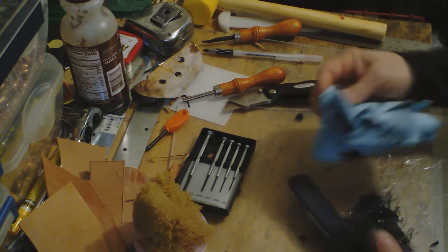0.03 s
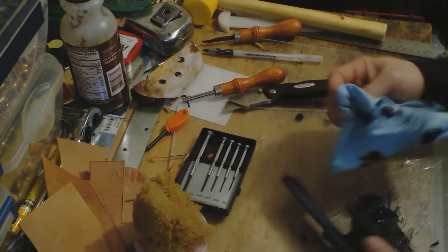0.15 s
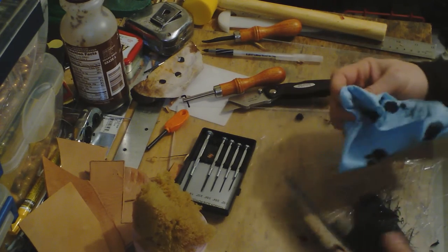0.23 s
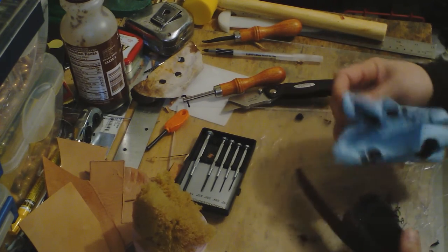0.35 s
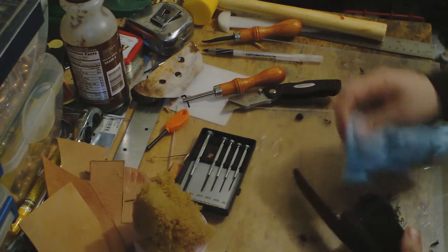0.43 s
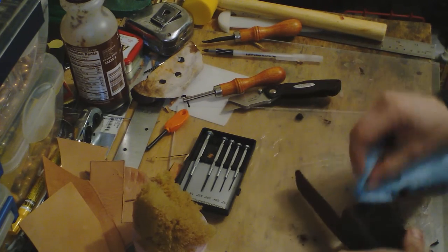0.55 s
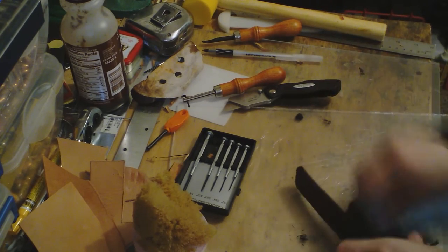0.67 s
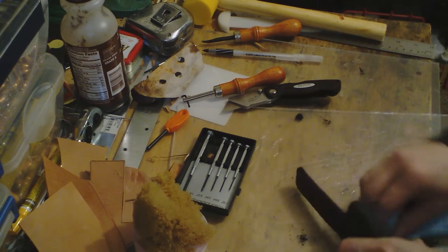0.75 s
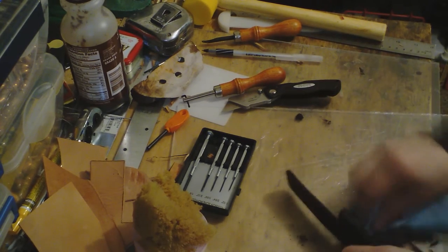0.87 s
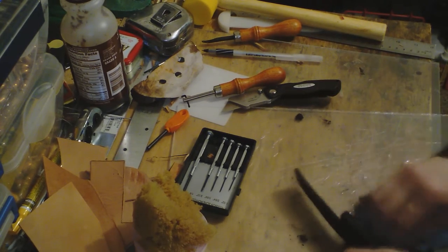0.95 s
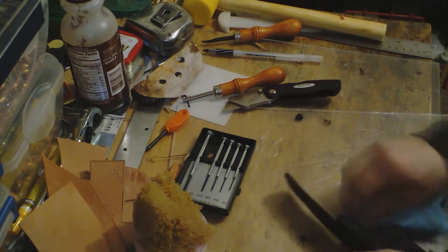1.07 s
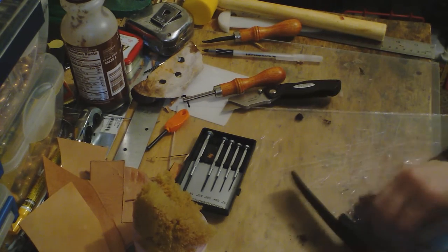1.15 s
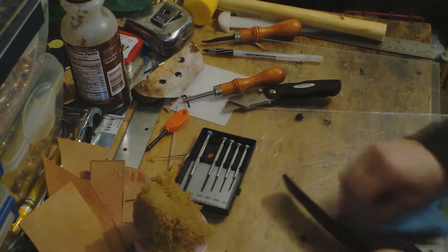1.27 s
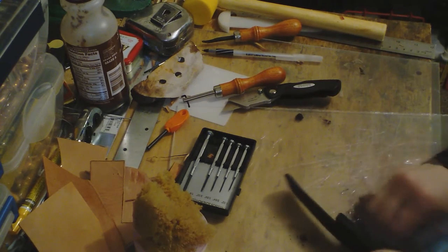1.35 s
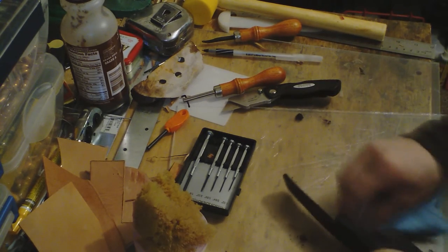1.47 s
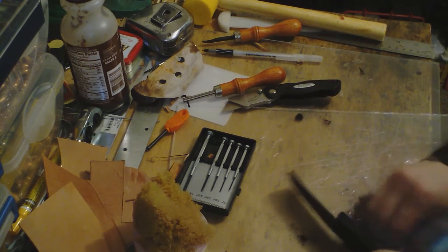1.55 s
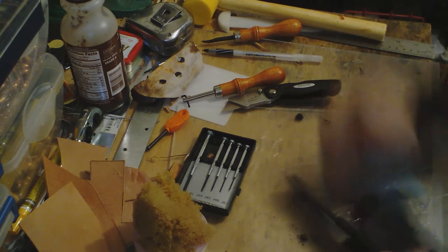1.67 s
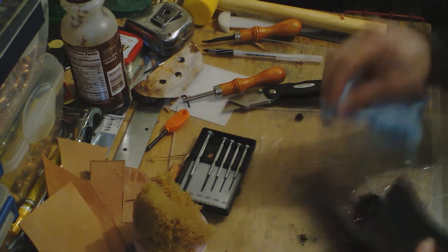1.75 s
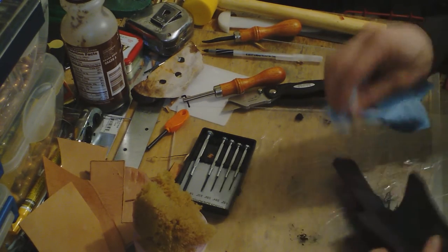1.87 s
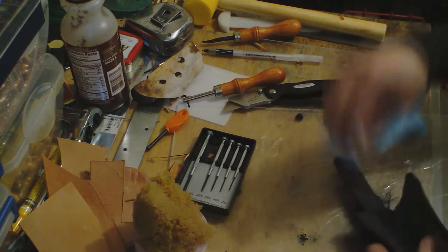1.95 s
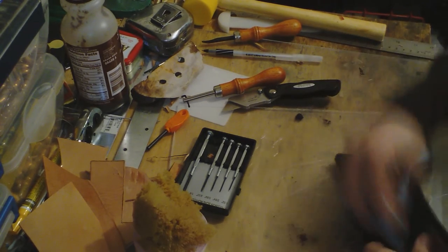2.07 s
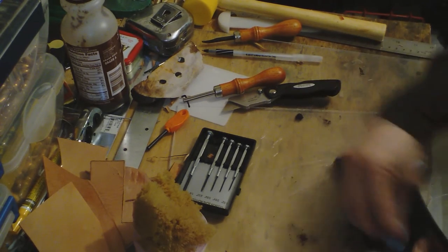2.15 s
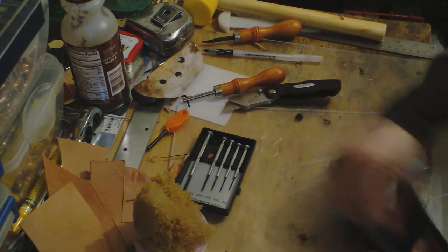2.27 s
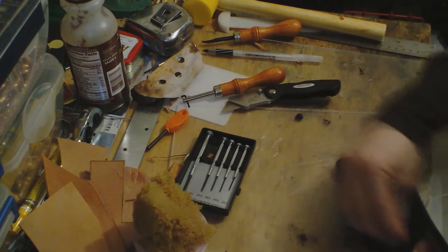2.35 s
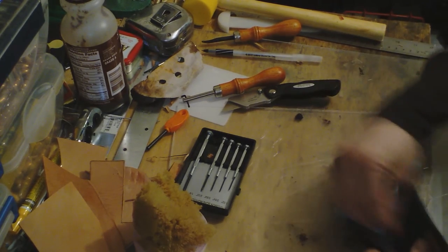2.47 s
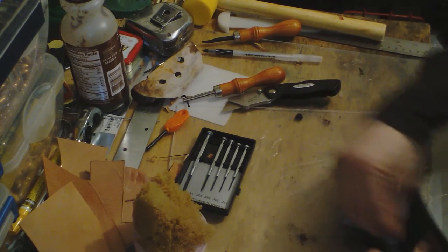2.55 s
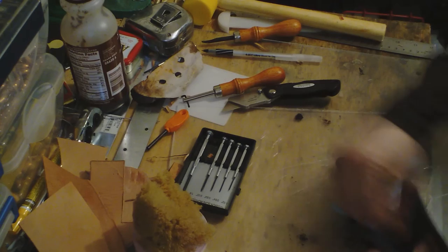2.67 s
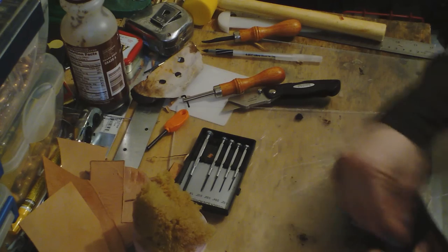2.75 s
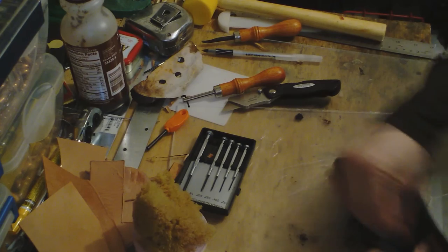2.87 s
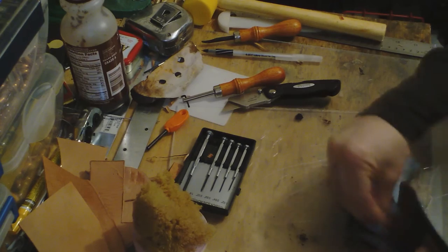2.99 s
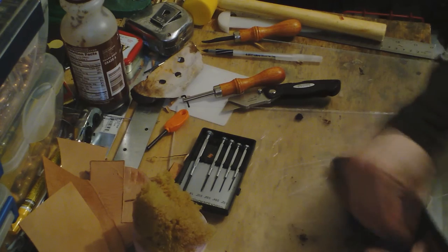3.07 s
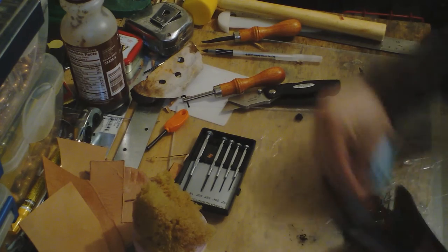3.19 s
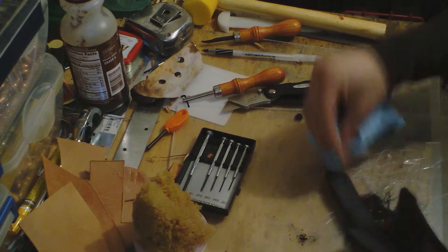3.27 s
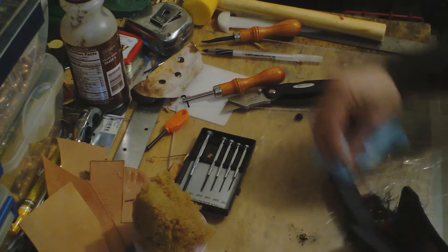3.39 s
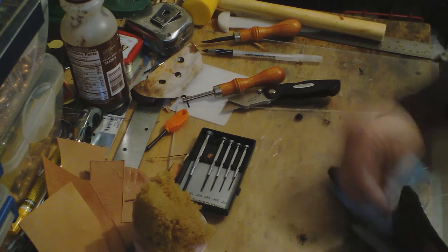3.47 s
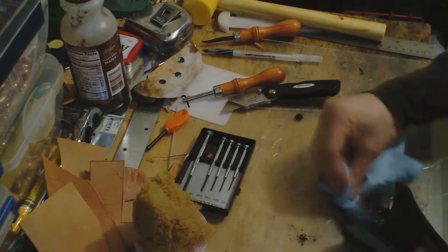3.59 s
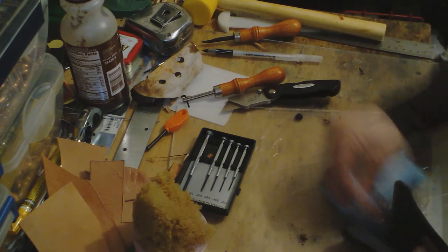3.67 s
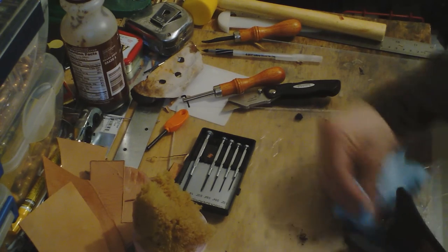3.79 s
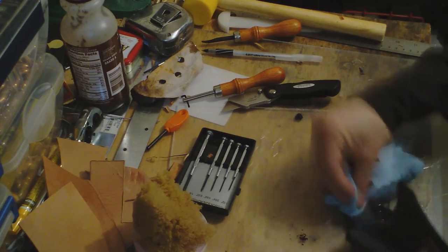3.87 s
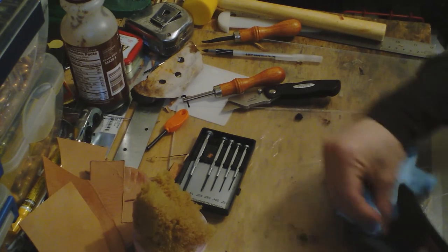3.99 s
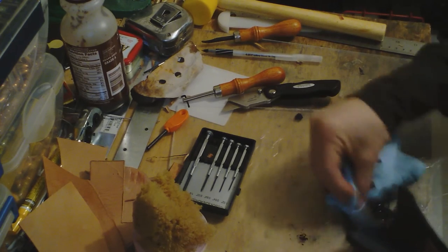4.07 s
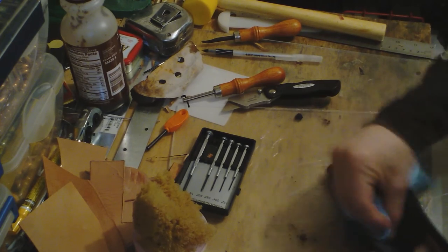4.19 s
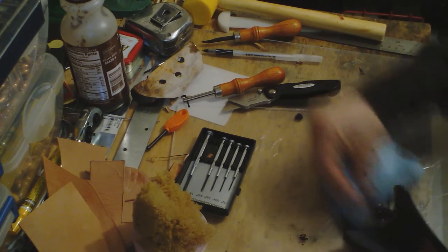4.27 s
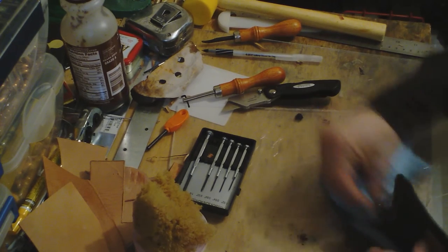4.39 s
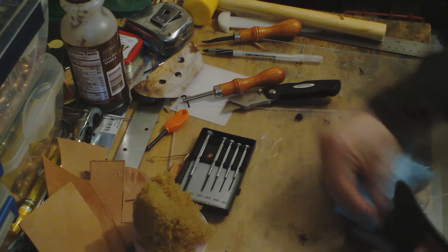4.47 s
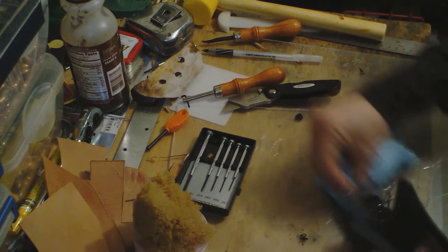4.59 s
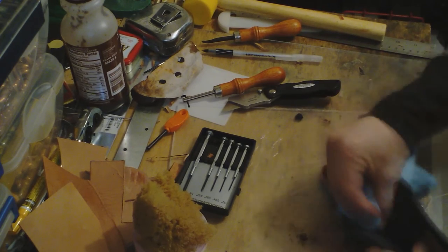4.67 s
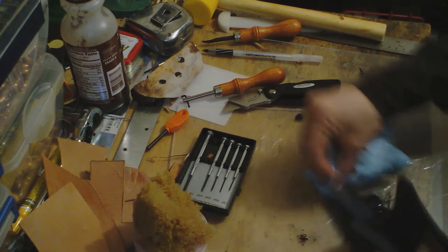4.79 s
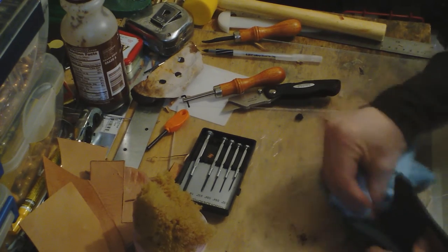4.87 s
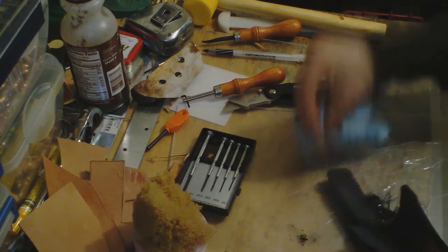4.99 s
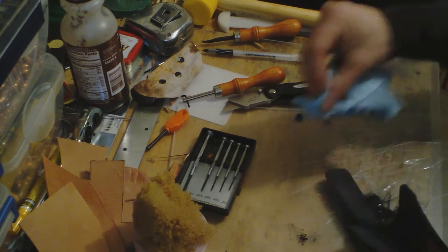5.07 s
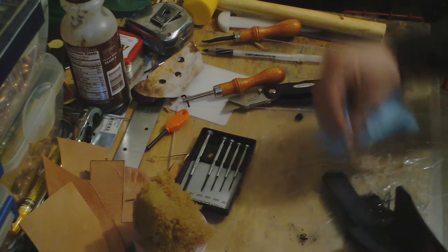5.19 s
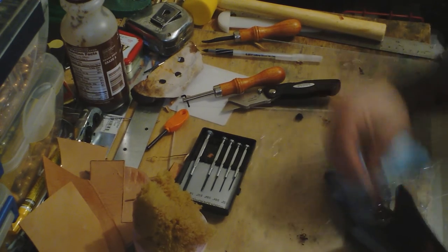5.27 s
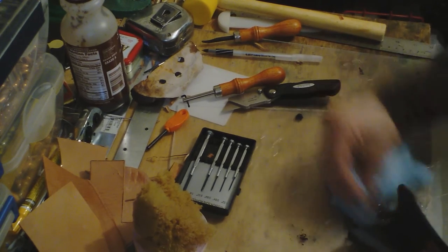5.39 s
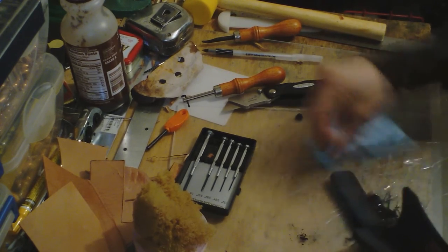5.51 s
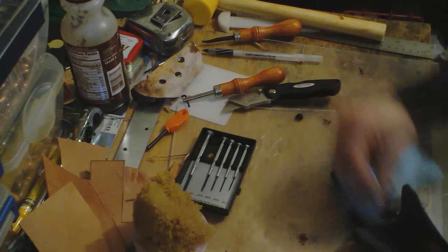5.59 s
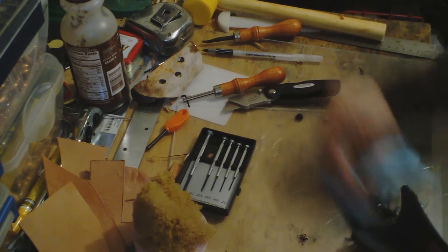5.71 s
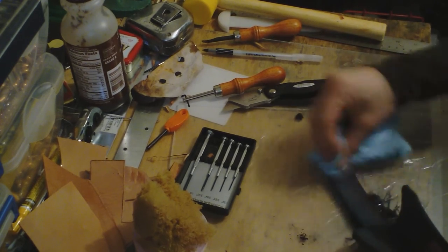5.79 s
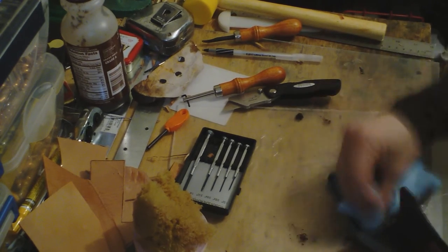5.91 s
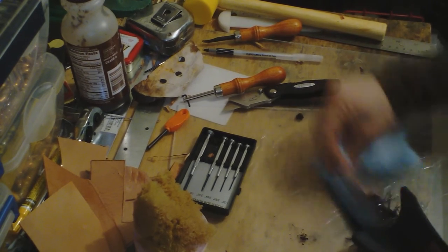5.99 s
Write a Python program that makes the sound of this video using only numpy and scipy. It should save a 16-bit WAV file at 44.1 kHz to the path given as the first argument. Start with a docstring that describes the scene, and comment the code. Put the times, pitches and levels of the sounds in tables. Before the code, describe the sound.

Close to one small microphone, with no room echo, someone briskly buffs leather with a paper towel on a wooden workbench. A fast run of papery swishes ends in a sharp, hollow knock. Two more runs follow, the last pressing harder on the wood, then two separate wipes. Light taps of the leather and low thuds and rumble from the hand come through the bench, with a constant hiss behind.

```python
"""A paper towel buffs a leather piece in quick strokes on a wooden workbench, heard close up.
Each stroke hisses in the air and drags grains of friction into the bench, which rings hollow
near 1.2 kHz. The piece knocks on the wood, and the hand thuds and rumbles through it.
One small microphone hears it all in mono, with no room echo, over a background hiss."""
import sys
import numpy as np
from scipy import signal
from scipy.fft import rfft, irfft, next_fast_len
from scipy.io import wavfile
from scipy.ndimage import uniform_filter1d

SR = 44100
rng = np.random.default_rng(int(sys.argv[2]) if len(sys.argv) > 2 else 0)


def store_wav(level_fs):
    """Save 16-bit WAV to argv[1]."""
    pcm = np.round(np.clip(np.atleast_2d(level_fs), -1, 1) * 32767)
    wavfile.write(sys.argv[1], SR, pcm.T.astype(np.int16))


N = 266805
TIME = np.arange(N) / SR


def from_db(db):
    """Decibels to gain."""
    return 10 ** (np.asarray(db) / 20)


def unit_rms(x):
    """Scale to rms 1."""
    return x / np.sqrt(np.mean(x ** 2) + 1e-20)


def drift(hz):
    """Slow random wander; rms 1."""
    r = np.exp(-2 * np.pi * hz / SR)
    return unit_rms(signal.lfilter([1], [1, -2 * r, r * r], rng.standard_normal(N + SR))[SR:])


def coloured(white, spectrum):
    """Give a white signal the spectrum of a table; rms 1."""
    size = next_fast_len(N)
    hz, db = np.transpose(spectrum)
    bins_hz = np.maximum(np.arange(size // 2 + 1) * SR / size, 1)
    gain = from_db(np.interp(np.log(bins_hz), np.log(hz), db))
    return unit_rms(irfft(rfft(white, size) * gain, size)[:N])


def ring(force, hz, t60):
    """One mode of the wood: a click sets a decaying sine ringing."""
    r, w = from_db(-60 / (t60 * SR)), 2 * np.pi * hz / SR
    return signal.lfilter([0, np.sin(w)], [1, -2 * r * np.cos(w), r * r], force + 1e-18)


def strike(modes, times, db, spread_db=1.5):
    """Each blow strikes every mode with a strength of its own."""
    at = np.round(times * SR).astype(int)
    scatter_db = rng.normal(0, spread_db, (len(at), len(modes)))
    sound = np.zeros(N)
    for k, (hz, mode_db, t60) in enumerate(modes):
        force = np.zeros(N)
        force[at] = (-1) ** k * from_db(db + mode_db + scatter_db[:, k])
        sound += ring(force, hz, t60)
    return sound


def cushioned(blows, band_hz):
    """A soft contact rounds the start of a blow: only a band of it is passed on."""
    return signal.sosfilt(signal.butter(2, band_hz, "band", fs=SR, output="sos"), blows)


def grains(per_s, spread_db):
    """Friction as random slips of uneven size; rms 1."""
    sizes = from_db(spread_db * np.minimum(rng.exponential(1, N), 4))
    signs = rng.choice([-1, 1], N)
    slips = rng.random(N) < per_s / SR
    return unit_rms(sizes * signs * slips)


def dragged(modes, pressure, per_s, spread_db):
    """Friction drives the bench modes; as the contact moves, each is driven more or less."""
    force = grains(per_s, spread_db)
    driven, steady = np.zeros((2, N))
    for k, (hz, db, t60) in enumerate(modes):
        weight = (-1) ** k * from_db(db)
        coupling = from_db(3.97 * drift(hz=10.4))
        driven += weight * ring(force * pressure * coupling, hz, t60)
        steady += weight * ring(force, hz, t60)
    return driven / np.std(steady)


# A thin band in the background hiss: (time [s], level [dB])
NARROW_HISS_LEVELS = [(0.0, -52.5), (0.7, -49.5), (1.7, -49.5), (2.3, -48), (3.0, -49), (3.5, -52.5),
                      (4.4, -47), (5.4, -55.5), (6.05, -50.5)]

def narrow_hiss():
    """Slow noise carried on a gliding tone: hiss near 5 kHz that wavers in pitch and level."""
    centre_hz, width_hz = 4963, 710
    level_db = np.interp(TIME, *np.transpose(NARROW_HISS_LEVELS))
    lowpass = signal.butter(2, width_hz / 2, fs=SR, output="sos")
    slow_noise = signal.sosfilt(lowpass, rng.standard_normal((2, N)))
    phase = 2 * np.pi * np.cumsum(centre_hz + 120 * drift(hz=5)) / SR
    band = unit_rms(slow_noise[0] * np.cos(phase) + slow_noise[1] * np.sin(phase))
    return band * from_db(level_db + 2.1 * drift(hz=29))


# Brief dips in the treble hiss: (time [s], length [ms])
HISS_DIPS = [(0.062, 64), (.195, 61), (.429, 32), (.56, 12), (0.628, 11), (1.095, 46), (2.063, 58),
             (2.564, 80), (3.268, 56), (4.065, 39), (5.568, 15)]

def treble_dips():
    """A gain that drops briefly now and then, with smoothed edges."""
    gain = np.ones(N)
    for start, ms in HISS_DIPS:
        gain[round(start * SR):round((start + ms / 1000) * SR)] = from_db(-10)
    return uniform_filter1d(gain, size=64)


# The noise floor, steady part and treble part: (frequency [Hz], relative density [dB])
STEADY_HISS_SPECTRUM = [(24, -32), (50, -6.5), (200, -10), (330, -6), (900, -5), (1230, -1.5), (1500, -5),
                        (2350, -7), (2900, 4.5), (3500, -4.5), (4100, -9.5), (6500, -7), (7600, -18.5),
                        (9000, -60)]
TREBLE_HISS_SPECTRUM = [(4000, -41), (6000, -11.5), (6650, -5.5), (7800, -23.5), (8450, -6.5), (9500, -4.5),
                        (10800, -10.5), (11500, -7), (12000, 3), (12500, -6.5), (12900, -7.5),
                        (14300, -0.5), (15300, -5)]

def background_hiss():
    """Background hiss: a steady part and a treble part that dips briefly."""
    steady = coloured(rng.standard_normal(N), STEADY_HISS_SPECTRUM) * from_db(-49 + 0.72 * drift(hz=4.5))
    treble = coloured(rng.standard_normal(N), TREBLE_HISS_SPECTRUM) * from_db(-42.5 + 0.44 * drift(hz=30))
    return steady + (treble + narrow_hiss()) * treble_dips()


# Low modes of the workbench: (frequency [Hz], relative level [dB], t60 [s])
BENCH_LOW_MODES = [(115.2, -11, 0.29), (179.4, -10.5, 0.15), (271, -9.5, 0.15), (338.3, -3.5, 0.12),
                   (464.4, 7, 0.069), (510.2, 9, 0.042), (657, -3.5, 0.084), (706, -3.5, 0.068)]
# Hand and piece landing on the bench:
# (time [s], relative level [dB], deepest mode offset [dB], hollow mode offset [dB])
BENCH_THUDS = [(0.536, -53.5, 2, -5), (0.783, -31, -7, -5), (1.016, -18, -11, -3), (1.882, -21, -10.5, 2),
               (1.968, -38, -26, 17), (2.549, -39, 7, -6), (3.418, -36, -3, -3), (4.501, -41, 4.5, -3),
               (4.957, -40, -1, -5), (5.144, -39, -1, 9), (5.558, -36.5, -2.5, -2), (5.698, -37.5, 0, 0),
               (5.868, -27.5, -13, -5)]

def thuds():
    """Soft, heavy contacts reach only the low modes; the deepest booms, the hollow one varies."""
    times, db, deep_db, hollow_db = np.transpose(BENCH_THUDS)
    body = strike(BENCH_LOW_MODES[1:3] + BENCH_LOW_MODES[4:], times, db - 6.5)
    hollow = strike(BENCH_LOW_MODES[3:4], times, db + hollow_db - 4.5)
    boom = strike(BENCH_LOW_MODES[:1], times, db + deep_db + 8)
    return cushioned(body - hollow, band_hz=(45, 368)) + cushioned(boom, band_hz=(45, 330))


# The bench's hollow ring near 1.2 kHz: (frequency [Hz], relative level [dB], t60 [s])
BENCH_RING_MODES = [(815, -14, .05), (950, -13, .05), (1085, -12, .045), (1165, -1, .055), (1235, -4, .045),
                    (1360, -17, .04), (1570, -20, .025), (1830, -17, .022), (2120, -21, .02)]
# The piece knocking and catching on the bench: (time [s], relative level [dB], low mode offset [dB])
LEATHER_KNOCKS = [(0.785, -21, -3), (0.809, -20, -17), (0.887, -18.5, -15), (1.021, -28.5, -20),
                  (1.092, -19, -8.5), (1.147, -14.5, -21), (1.331, -17, -15.5), (1.54, -18, -14.5),
                  (1.554, -12.5, -23), (1.738, -16, -21), (1.879, 6, -19), (1.948, -11.5, -14.5),
                  (2.114, -5, -22.5), (2.511, -20, -11), (2.542, -23, -2), (2.756, -24, -21),
                  (2.793, -18, -13), (3.194, -17, -15), (3.273, -17.5, -2), (3.363, -16.5, -13.5),
                  (3.399, -5, -41), (3.766, -14.5, -33), (3.812, -14, -26), (4.132, -17, -28),
                  (4.289, -15.5, -11), (4.354, -15.5, -25), (4.457, -19.5, -26), (4.509, -10, -20),
                  (4.74, -14, -30), (4.822, -9.5, -20.5), (4.957, -16, -33), (5.028, -22.5, -3.5),
                  (5.142, -15, -18), (5.564, -20, -32), (5.633, -20, -34), (5.717, -12.5, -11),
                  (5.923, -14, -26)]

def knocks():
    """The leather hits the bench: strong blows are hard and bright, the towel cushions weak ones."""
    times, db, low_db = np.transpose(LEATHER_KNOCKS)
    times = times - 0.0019  # the force starts before the ring stands out
    hard = db > -14.5
    bright = strike(BENCH_RING_MODES, times[hard], db[hard] - 8, spread_db=0.7)
    soft = strike(BENCH_RING_MODES, times[~hard], db[~hard] - 3.5)
    low = strike(BENCH_LOW_MODES, times, db + low_db - 13, spread_db=5)
    return (cushioned(bright, band_hz=(710, 1970))
            + cushioned(soft, band_hz=(1000, 1380))
            + cushioned(low, band_hz=(306, 724)))


# The hand resting on the work between strokes: (time [s], relative drag [dB], rumble level [dB])
HAND_CONTACT = [(0.0, -45.5, -59), (0.45, -71, -77), (0.75, -49, -63), (1.03, -33.5, -44), (1.43, -43, -62),
                (1.9, -69, -51), (2.16, -44, -53), (2.53, -43, -50.5), (3.0, -35, -60), (3.3, -32.5, -57),
                (3.5, -45, -65), (3.9, -37.5, -57), (4.5, -37.5, -55), (5.15, -55.5, -50.5),
                (5.3, -59, -56), (5.53, -47, -68.5), (5.7, -45.5, -50), (6.05, -44, -53)]

def resting_hand():
    """Gains of the drag and the rumble that go on under the strokes."""
    times, drag_db, rumble_db = np.transpose(HAND_CONTACT)
    return from_db(np.interp(TIME, times, drag_db)), from_db(np.interp(TIME, times, rumble_db))


# The hand's rumble at the bench: (frequency [Hz], relative density [dB])
RUMBLE_SPECTRUM = [(13, -38), (22, -2), (48, 18), (81, -11), (119, 2.5), (150, -8.5), (220, -4), (290, -52),
                   (480, -120)]
FIRM_PRESSURE_DB = -30

def hand_rumble(pressure_db, resting_rumble):
    """The shove of the hand rumbles, louder under a firmer stroke."""
    shove = stroke_gain(-55 + 0.7 * (pressure_db - FIRM_PRESSURE_DB), stretch=0.42)
    return coloured(rng.standard_normal(N), RUMBLE_SPECTRUM) * np.hypot(shove, resting_rumble)


def bench_friction(pressure_db, drag):
    """Coarse catches under the towel and the resting hand shake the bench's ring and low modes."""
    wavering_drag = drag * from_db(-9 + 1.5 * drift(hz=29))
    ring_drive = np.hypot(stroke_gain(pressure_db, stretch=0.77), wavering_drag)
    low_db = -42 + 0.97 * (pressure_db - FIRM_PRESSURE_DB)
    low_drive = np.hypot(stroke_gain(low_db, stretch=0.87), drag * from_db(-13.5))
    return (dragged(BENCH_RING_MODES, ring_drive, per_s=1100, spread_db=3.4)
            + dragged(BENCH_LOW_MODES, low_drive, per_s=700, spread_db=3.9))


# Paper on leather, close to the microphone: (frequency [Hz], relative density [dB])
PAPER_SPECTRUM = [(880, -48), (1500, -2), (1850, -13.5), (2350, -13.5), (2530, -7), (2730, -13.5),
                  (3120, -4), (3680, -14), (5160, -1.5), (6550, -8.5), (7600, -24), (9880, -19.5),
                  (16700, -120)]

def paper_hiss(hiss_db):
    """Dense, tiny slips of the paper merge into a hiss that comes straight through the air."""
    hiss = coloured(grains(per_s=14000, spread_db=-3.5), PAPER_SPECTRUM)
    return hiss * stroke_gain(hiss_db, stretch=0.73) * from_db(2.05 * drift(hz=18))


# Towel strokes across the leather: (middle time [s], hiss level [dB], pressure on the bench [dB])
TOWEL_STROKES = [(0.859, -65, -44), (1.051, -49.5, -63), (1.158, -37, -38.5), (1.257, -37, -39.5),
                 (1.359, -36, -39.5), (1.466, -37.5, -34.5), (1.566, -35.5, -36), (1.672, -38, -32.5),
                 (1.766, -38.5, -35), (1.856, -35.5, -32), (1.977, -53, -44), (2.317, -47.5, -47.5),
                 (2.409, -39.5, -35.5), (2.513, -40, -36), (2.618, -43, -40.5), (2.713, -47, -49),
                 (2.816, -37, -34), (2.914, -42, -51), (3.011, -38.5, -43), (3.11, -41, -47.5),
                 (3.206, -36, -37.5), (3.299, -38, -41.5), (3.401, -36.5, -26.5), (3.791, -43.5, -36.5),
                 (3.915, -42.5, -37), (4.016, -46.5, -42), (4.158, -45, -37), (4.268, -43.5, -30.5),
                 (4.383, -44.5, -33.5), (4.504, -40.5, -31.5), (4.611, -44, -29.5), (4.742, -38.5, -28.5),
                 (4.852, -46, -31.5), (4.96, -37, -27.5), (5.063, -46.5, -37.5), (5.166, -37.5, -27.5),
                 (5.646, -40, -26), (5.942, -37, -26)]

def stroke_gain(levels_db, stretch):
    """Each stroke swells and fades in a bell curve; strokes add in power."""
    power = np.zeros(N)
    for (middle, hiss_db, _), db in zip(TOWEL_STROKES, levels_db):
        length_ms = stretch * (70.2 + 2 * (-34.5 - hiss_db))  # a slower stroke hisses less, lasts longer
        half = max(round(length_ms / 1000 * SR), 8)
        at = round(middle * SR) + np.arange(-half, half + 1)
        inside = at < N
        power[at[inside]] += (from_db(db) * np.hanning(len(at))[inside]) ** 2
    return np.sqrt(power)


def towel():
    """With each buffing stroke the paper hisses, the bench rings and the hand rumbles."""
    _, hiss_db, pressure_db = np.transpose(TOWEL_STROKES)
    drag, rumble = resting_hand()
    return paper_hiss(hiss_db) + bench_friction(pressure_db, drag) + hand_rumble(pressure_db, rumble)


def scene():
    """One microphone at the bench feeds both channels."""
    return np.tile(towel() + knocks() + thuds() + background_hiss(), (2, 1))


def record(dry):
    """A narrow notch sits near 8 kHz, and the top is cut."""
    notch_hz, cutoff_hz = (7740, 8020), 15400
    notched = signal.sosfilt(signal.butter(2, notch_hz, "bandstop", fs=SR, output="sos"), dry)
    return signal.sosfilt(signal.ellip(12, .5, 80, cutoff_hz, fs=SR, output="sos"), notched)


dry = scene()
out = record(dry)
store_wav(out)
```